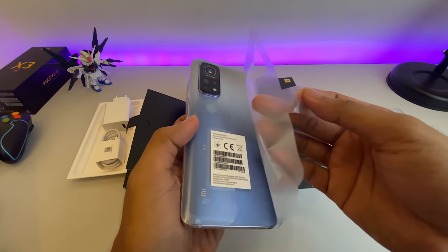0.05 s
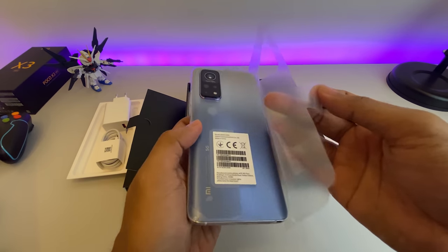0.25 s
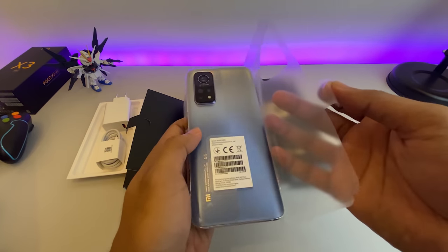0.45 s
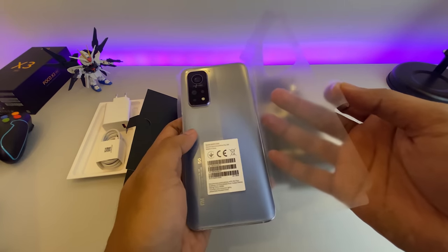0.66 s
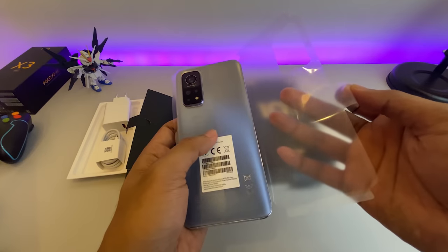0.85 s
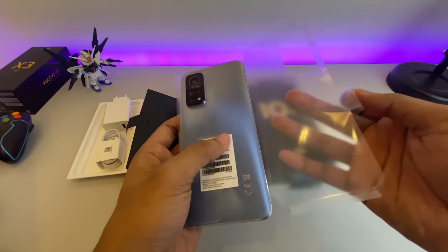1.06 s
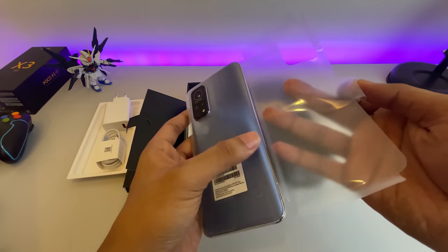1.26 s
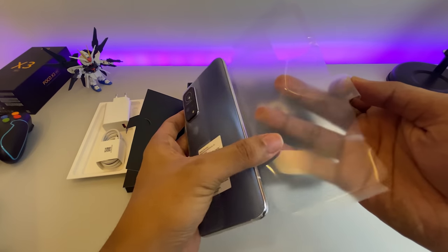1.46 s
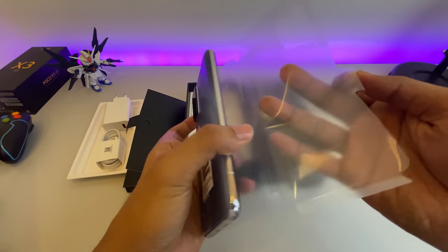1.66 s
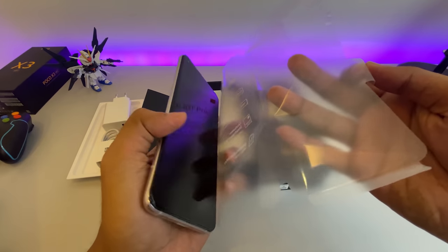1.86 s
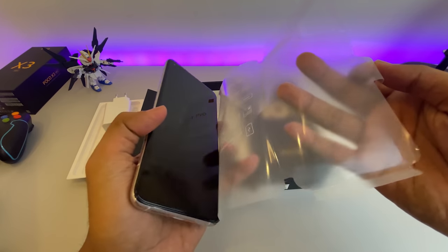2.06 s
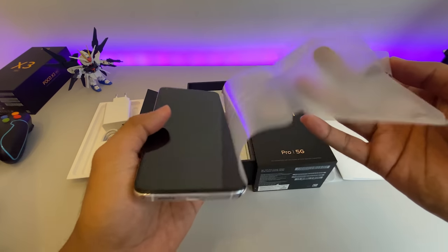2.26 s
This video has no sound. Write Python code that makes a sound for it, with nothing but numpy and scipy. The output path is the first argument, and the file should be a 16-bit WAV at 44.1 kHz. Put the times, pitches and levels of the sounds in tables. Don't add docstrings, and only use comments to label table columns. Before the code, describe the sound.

Thin plastic film crinkling and snapping in uneven bursts, with soft rustles and quiet gaps between.

```python
import sys
import numpy as np
from scipy import signal
from scipy.fft import rfft, irfft, next_fast_len
from scipy.io import wavfile

SR = 44100
rng = np.random.default_rng(int(sys.argv[2]) if len(sys.argv) > 2 else 0)


def rack_gain(trim_db):
    fader = np.asarray(trim_db, float)
    return 10 ** (fader / 20)


def master(y):
    cut = np.clip(np.atleast_2d(y).T, -1, 1)
    pcm = np.round(cut * 32767)
    wavfile.write(sys.argv[1], SR, pcm.astype(np.int16))


N = 101429
PORT_LAG = int(0.0003 * SR)


def rms_one(x):
    return x / np.sqrt(np.mean(x ** 2) + 1e-20)


def band(x, low_hz, high_hz, order=2):
    return signal.sosfilt(signal.butter(order, [low_hz, high_hz], "band", fs=SR, output="sos"), x)


def colour(x, points):
    hz = np.maximum(np.fft.rfftfreq(x.shape[-1], 1 / SR), 1)
    point_hz, point_db = np.transpose(points)
    gain_db = np.interp(np.log(hz), np.log(np.maximum(point_hz, 1)), point_db)
    return irfft(rfft(x) * rack_gain(gain_db), x.shape[-1])


def drift(rate_hz):
    r = np.exp(-2 * np.pi * rate_hz / SR)
    noise = rng.standard_normal(N + SR)
    return rms_one(signal.lfilter([1], [1, -2 * r, r * r], noise)[SR:])


def follow(points):
    return np.interp(np.arange(N) / SR, *np.transpose(points))


def add(out, start_s, sound):
    i = int(start_s * SR)
    out[:, i:i + sound.shape[1]] += sound[:, :N - i]


# start_s, peak_db, sizzle_over_body_db, ring_hz
CREASES = [(0.1026, -26.5, 1.5, 1770), (0.2161, -13, 4.5, 6230), (0.2423, -23, -18, 2580),
           (0.264, -26, 1.5, 1860), (0.2772, 0.5, -6, 5430), (0.3508, -21.5, -30, 3420),
           (0.4489, -26.5, -5, 3800), (0.4785, -27, 2.5, 1860), (0.5234, -15.5, -2.5, 2120),
           (0.5528, -13, -8, 5650), (0.5634, -14, -9, 5400), (0.6005, -24, -35, 1880),
           (0.83, -22, -5.5, 4950), (0.9504, -30, -12.5, 3320), (1.065, -38, 11.5, 3340),
           (1.264, -34.5, -8.5, 1620), (1.5346, -29, -26, 1730), (1.5923, -21, -16.5, 1450),
           (1.6114, -17, -3.5, 2210), (1.6349, -7.5, -5.5, 5480), (1.7407, -25.5, -32.5, 1620),
           (1.7596, -20, -38.5, 5300), (1.9181, -30, 6.5, 4700), (1.925, -16, 2, 4740),
           (1.946, -19.5, -5.5, 2260), (1.9686, -18, -16, 1470), (1.9829, -17, 4.5, 3400),
           (2.0128, -23, 5, 2400), (2.0393, -25, -3, 3140), (2.2006, -32.5, -3, 2230)]
# start_s, peak_db, sizzle_over_body_db, ring_hz
LOOSE_TICKS = [(0.0, -40, -8, 4000), (0.0343, -38, -9, 2900), (0.3017, -24, -23, 3900),
               (0.411, -29.5, 4, 3160), (0.4207, -36, -17, 3430), (0.5484, -29.5, 5, 4900),
               (0.6174, -28, 1.5, 1970), (0.8091, -44.5, -4, 5550), (1.0336, -45, -12, 1535),
               (1.1144, -63, -1, 3000), (1.1393, -34, 0, 5750), (1.1544, -51, 2.5, 1550),
               (1.3523, -51.5, -5, 3030), (1.3845, -43.5, 1, 3460), (1.4375, -38, -8, 5150),
               (1.46, -35.5, -4, 6300), (1.5259, -28, -20, 1800), (1.5809, -33, -0.5, 1680),
               (1.6978, -28.5, -38, 1440), (1.8353, -61, -3, 5000), (1.8455, -63, -1, 5000),
               (1.8557, -46, 4.5, 4420), (1.866, -57, 11, 5000), (1.8921, -44, 5, 2400),
               (1.9077, -34.5, 3, 4880), (1.934, -28, 4, 2600), (1.941, -32, 8, 3000),
               (1.9485, -35, 14, 3540), (1.9515, -26, 10, 2980), (1.979, -22.5, 7.5, 2980),
               (1.994, -25.5, 0, 2730), (2.005, -39, 8, 3000), (2.016, -24.5, -15, 3470),
               (2.02, -30, -7, 3500), (2.025, -52, 0, 3000), (2.168, -46.5, -13, 3000),
               (2.1359, -38.5, -13, 1500), (2.2793, -44, -14, 2570)]


def snaps(rows, tail_db):
    rise_s, burst_s, tail_s, sizzle_fade_s = 0.001, 0.0013, 0.008, 0.005
    ring_width, ring_db, sizzle_gain_db, snap_db = 0.24, 6, -1.5, -2.5
    shared = 0.7
    out, t = np.zeros((2, N)), np.arange(SR // 16) / SR
    decay = np.exp(-t / burst_s) + rack_gain(tail_db) * np.exp(-t / tail_s)
    shape = (1 - np.exp(-t / rise_s)) * decay
    for start_s, peak_db, sizzle_db, ring_hz in rows:
        unevenness = np.sqrt(rng.exponential(1, len(t)))
        slips = rng.standard_normal((3, len(t))) * unevenness * shape
        common = np.array([slips[0], np.roll(slips[0], PORT_LAG)])
        heard = shared * common + (1 - shared) * slips[1:]
        ring = rms_one(band(heard, ring_hz / (1 + ring_width), ring_hz * (1 + ring_width), order=1))
        body = rms_one(band(heard, 1240, 6450, order=3)) + rack_gain(ring_db) * ring
        sizzle = band(heard * np.exp(-t / sizzle_fade_s), 6850, 13430)
        snap = body / abs(body).max()
        snap = snap + rack_gain(sizzle_db + sizzle_gain_db) * sizzle / abs(sizzle).max()
        add(out, start_s, rack_gain(peak_db + snap_db) * snap)
    return out


# start_s, level_db, fall_s (time scale of the pitch fall), fade_s
BENDING_WAVES = [(0.215, -32.5, 0.0032, 0.0029), (0.276, -45, 0.0038, 0.023), (0.309, -40.5, 0.0029, 0.048),
                 (0.347, -36.5, 0.0011, 0.0067), (0.491, -39.5, 0.0032, 0.0058), (.551, -40.5, 0.03, 0.035),
                 (.563, -33.5, 0.009, 0.018), (0.599, -37, 0.0036, 0.013), (.618, -38, 0.0031, 0.018),
                 (0.657, -46, 0.0015, 0.018), (.81, -41.5, 0.0024, 0.0078), (0.831, -35.5, 0.0022, 0.047),
                 (0.877, -45.5, 0.002, 0.0057), (0.448, -40.5, 0.0043, 0.0041), (1.137, -52, 0.0015, 0.019),
                 (1.262, -45.5, 0.0025, 0.013), (1.504, -47.5, 0.0043, 0.0096),
                 (1.526, -39, 0.0022, 0.0069), (1.532, -33, 0.0044, 0.007), (1.547, -41.5, 0.0038, 0.029),
                 (1.582, -38, 0.0027, 0.036), (1.605, -39, 0.01218, 0.017), (1.635, -29, 0.0024, 0.008),
                 (1.674, -51, 0.0015, 0.04), (1.697, -44, 0.003, 0.016), (1.732, -35.5, 0.0025, 0.042),
                 (1.742, -38.5, 0.0075, 0.0087), (1.756, -27.5, 0.00094, 0.027),
                 (1.967, -38, 0.0027, 0.047), (2.136, -46.5, 0.00344, 0.0099),
                 (1.791, -46.5, 0.0029, 0.058), (2.273, -49.5, 0.0032, 0.093)]


def flaps():
    start_hz, fall_power, waver = 1500, 1.6, 0.22
    scatter_s, scatter_db, left_over_right_db = 0.008, -9, 7
    port_gain = rack_gain([[left_over_right_db / 2], [-left_over_right_db / 2]])
    out, t = np.zeros((2, N)), np.arange(SR // 8) / SR
    for start_s, level_db, fall_s, fade_s in BENDING_WAVES:
        wander = np.interp(t, np.arange(43) * 0.00303, rng.normal(0, 1, 43))
        pitch_hz = start_hz * np.exp(waver * wander) * (1 + t / fall_s) ** -fall_power
        phase = 2 * np.pi * np.cumsum(pitch_hz) / SR
        wave = np.sin(phase) * (1 - np.exp(-t / 0.0015)) * np.exp(-t / fade_s)
        lags = (rng.random((2, 4)) * scatter_s * SR).astype(int)
        gains = rng.normal(0, 1, (2, 4))
        copies = np.zeros((2, len(t)))
        for port in range(2):
            for lag, gain in zip(lags[port], gains[port]):
                copies[port] += gain * np.roll(wave, lag)
        add(out, start_s, rack_gain(level_db) * port_gain * (wave + rack_gain(scatter_db) * copies))
    return out


# start_s, level_db, pitch_hz, fade_s
PANEL_POPS = [(.112, -45.5, 1716, 0.0088), (.556, -31, 898, 0.0042), (.564, -30, 686, 0.0079),
              (.575, -44, 410, 0.007), (.83, -34.5, 1126, 0.0025), (1.065, -47, 904, 0.0035),
              (1.533, -30.5, 1640, 0.0029), (1.533, -31, 626, 0.0055), (1.608, -30, 630, .004),
              (1.616, -34, 530, 0.0057), (1.741, -29, 558, 0.0056), (2.275, -53.5, 1720, 0.0068),
              (1.638, -33, 260, 0.0067), (.622, -31, 204, 0.0071), (2.201, -43, 2570, 0.0038),
              (0.243, -28, 2900, .002)]


def knocks():
    out, t = np.zeros((2, N)), np.arange(SR // 16) / SR
    for start_s, level_db, pitch_hz, fade_s in PANEL_POPS:
        shape = (1 - np.exp(-t / 0.001)) * np.exp(-t / fade_s)
        ring = np.sin(2 * np.pi * pitch_hz * t + rng.uniform(0, 1.44, (2, 1)))
        add(out, start_s, rack_gain(level_db) * rack_gain([[3], [-3]]) * shape * ring)
    return out


# time_s, level_db
WORKING = [(0, -63.5), (.21, -49.5), (0.301, -39), (.4, -47.5), (.5, -49), (0.618, -44.5), (.77, -74.5),
           (.87, -60.5), (0.999, -86), (1.14, -62), (1.222, -96), (1.42, -55), (1.56, -65.5), (1.67, -47),
           (1.89, -66), (2.018, -42.5), (2.18, -82), (2.3, -52)]
# frequency_hz, density_db (per Hz)
FILM_COLOUR = [(300, -10.5), (500, 6), (1300, -7), (2500, 4), (6000, 3.5), (8000, 0), (11000, -4.5),
               (14000, -5.5)]


def rustle():
    grains_per_s, grain_spread_db, grain_fade_s = 5000, 3.0, 0.0006
    rustle_db, clump_db = 0.5, 1.6
    sizes = rack_gain(grain_spread_db * np.minimum(rng.exponential(1, (3, N)), 4))
    slips = sizes * (rng.random((3, N)) < grains_per_s / SR)
    fades = signal.lfilter([1], [1, -np.exp(-1 / (grain_fade_s * SR))], slips)
    puffs = fades * rng.standard_normal((3, N))
    common = np.array([puffs[0], np.roll(puffs[0], PORT_LAG)])
    grains = rms_one(colour(0.44 * common + 2.3 * puffs[1:], FILM_COLOUR))
    return rack_gain(follow(WORKING) + rustle_db + clump_db * drift(59)) * grains


# time_s, level_db
FINGER_SLIDE = [(0, -79.5), (.3, -52.5), (0.449, -65.5), (.62, -59), (.75, -99), (0.999, -86),
                (1.14, -61.5), (1.25, -64.5), (1.45, -67), (1.52, -62), (1.56, -79), (1.658, -40.5),
                (1.85, -103), (2.0, -104), (2.12, -54), (2.18, -99), (2.25, -57.5)]


def slide():
    hiss = rms_one(band(rng.standard_normal((2, N)), 7500, 15000, order=1))
    return rack_gain(follow(FINGER_SLIDE) + 3.2 * drift(23)) * hiss


# time_s, level_db
SHEET_SWAY = [(0.0, -65.5), (0.18, -56), (0.47, -51), (0.59, -56), (0.89, -69.5), (1.14, -62), (1.5, -59.5),
              (1.71, -48), (1.82, -58), (1.97, -59), (2.3, -54.5)]


def wobble():
    wobble_db, lump_db = -2, 7
    noise = rng.standard_normal((3, N))
    low = band(0.37 * noise[0] + noise[1:], 45, 407, order=1) * rack_gain([[2.5], [-2.5]])
    return rack_gain(wobble_db + follow(SHEET_SWAY) + lump_db * drift(22)) * rms_one(low)


def room(x):
    t60_s, wall_cut_hz = 0.25, 5500
    size = next_fast_len(N + SR)
    delay = np.exp(-2j * np.pi * np.fft.rfftfreq(size))
    dull = np.exp(-2 * np.pi * wall_cut_hz / SR)
    wall = (1 - dull) / (1 - dull * delay)
    out = np.zeros((2, size // 2 + 1), complex)
    lags = (rng.uniform(0.006, 0.028, 16) * SR).astype(int)
    for k, lag in enumerate(lags):
        loop = rack_gain(-60 * lag / SR / t60_s) * wall * delay ** lag
        out[k % 2] += loop / (1 - loop) * (-1) ** (k // 2)
    return irfft(out * rfft(x, size), size)[:, :N]


# frequency_hz, left_over_right_db
LEFT_OVER_RIGHT = [(60, 4), (180, 2), (550, 8), (1650, 4), (4970, 7), (15000, -2)]


def near_left(film):
    left = colour(film[0], [(hz, db / 2) for hz, db in LEFT_OVER_RIGHT])
    right = colour(film[1], [(hz, -db / 2) for hz, db in LEFT_OVER_RIGHT])
    return np.array([left, right])


# frequency_hz, density_db (per Hz)
ROOM_COLOUR = [(40, 8), (245, -6.5), (700, -11), (1700, -38.5), (9000, -31), (16000, -53.5)]


def room_tone():
    noise = rng.standard_normal((3, N))
    alike = signal.lfilter([0.06], [1, -0.94], noise[0]) * 1.2
    return rack_gain(-55) * rms_one(colour(noise[1:] + alike, ROOM_COLOUR)) * rack_gain([[1.5], [-1.5]])


def scene():
    cracks = snaps(CREASES, tail_db=-16) + snaps(LOOSE_TICKS, tail_db=-23)
    echo = rack_gain(-18) * room(cracks[0] - cracks[1])
    film = near_left(cracks + rustle() + echo)
    return film + flaps() + knocks() + slide() + wobble() + room_tone()


def roll_off(x):
    return signal.sosfilt(signal.butter(12, 17100, fs=SR, output="sos"), x)


def record(dry):
    notch_hz, notch_width_hz, dip_hz, dip_width_hz = 12100, 1100, 7400, 700
    x = signal.sosfilt(signal.butter(4, 55, "high", fs=SR, output="sos"), dry)
    x = signal.sosfilt(signal.cheby2(10, 28, 16000, fs=SR, output="sos"), x)
    edges_hz = [notch_hz - notch_width_hz / 2, notch_hz + notch_width_hz / 2]
    x = signal.sosfilt(signal.butter(2, edges_hz, "stop", fs=SR, output="sos"), x)
    dipped = signal.lfilter(*signal.iirnotch(dip_hz, dip_hz / dip_width_hz, SR), x)
    return roll_off(0.5 * x + 0.5 * dipped)


dry = scene()
out = record(dry)
master(out)
```